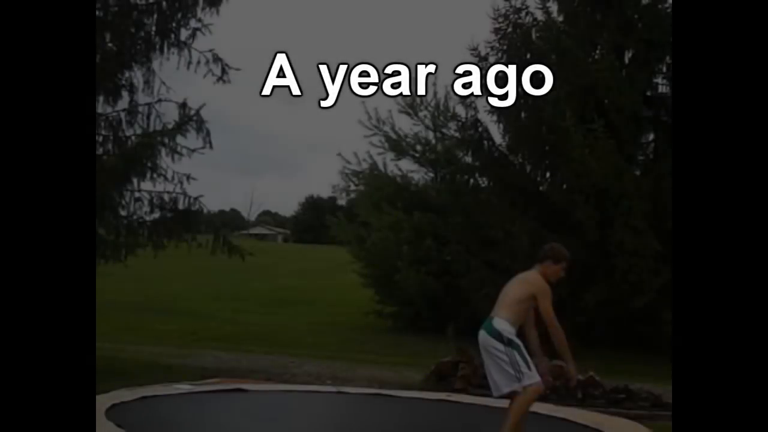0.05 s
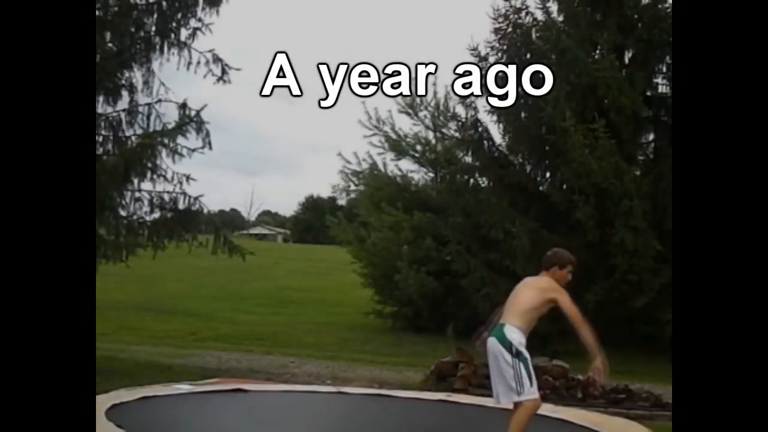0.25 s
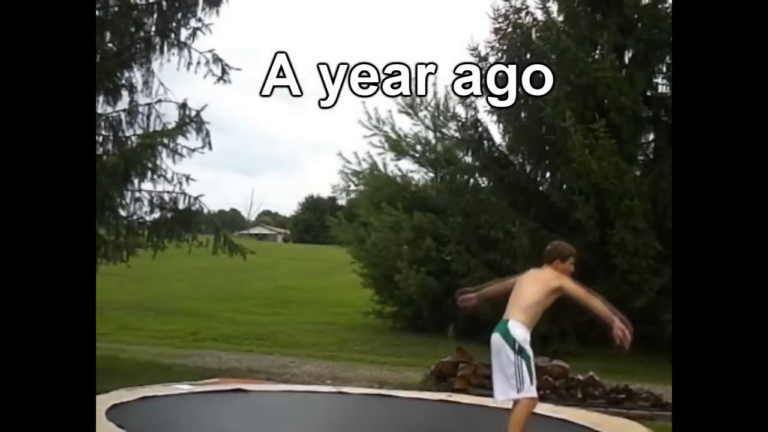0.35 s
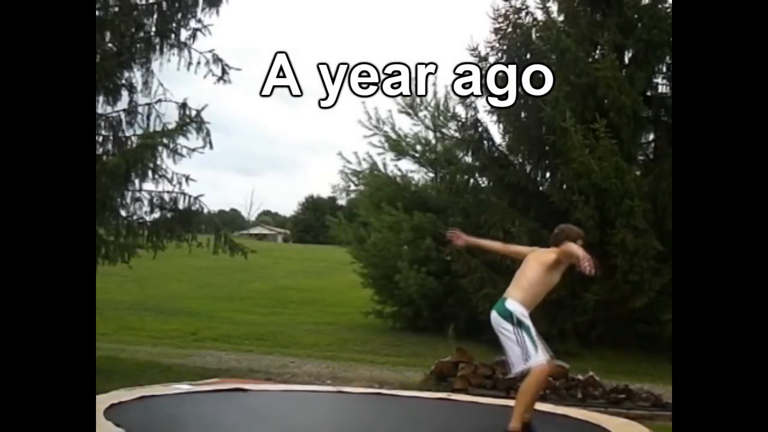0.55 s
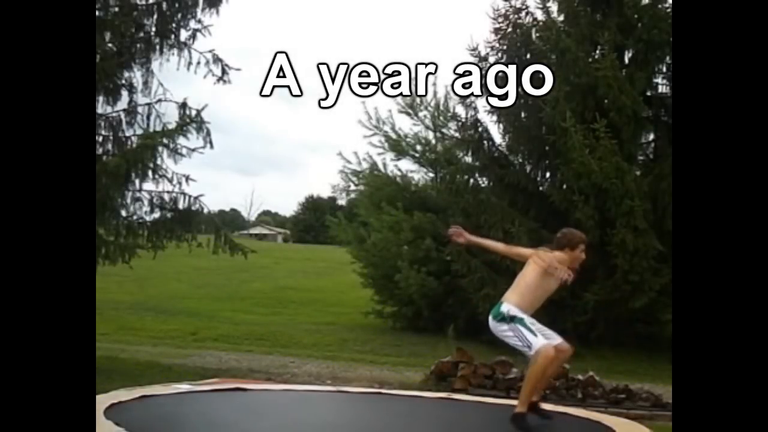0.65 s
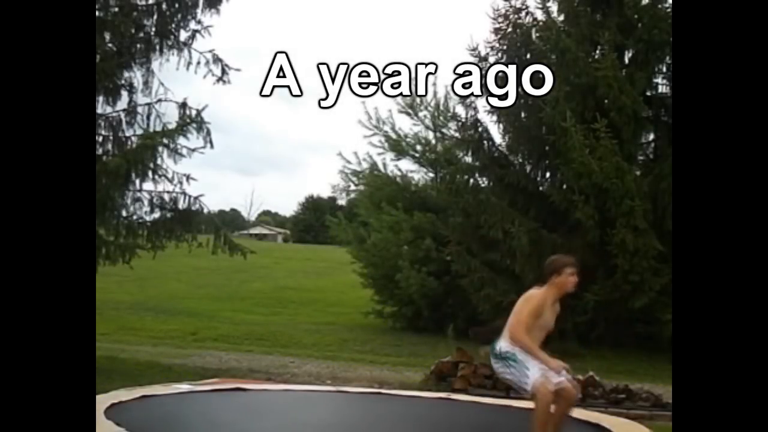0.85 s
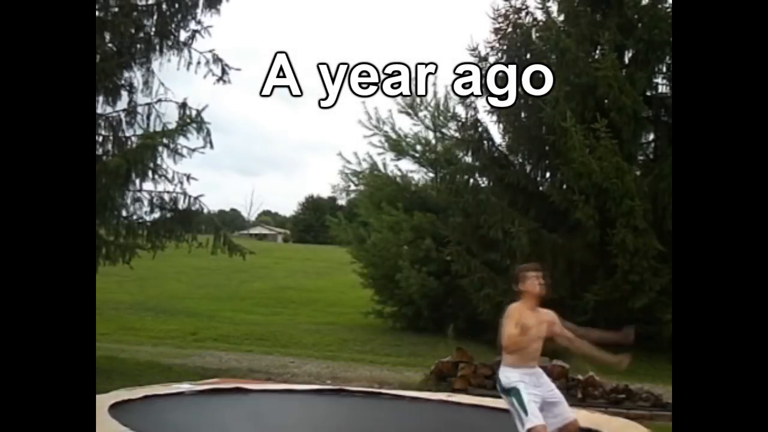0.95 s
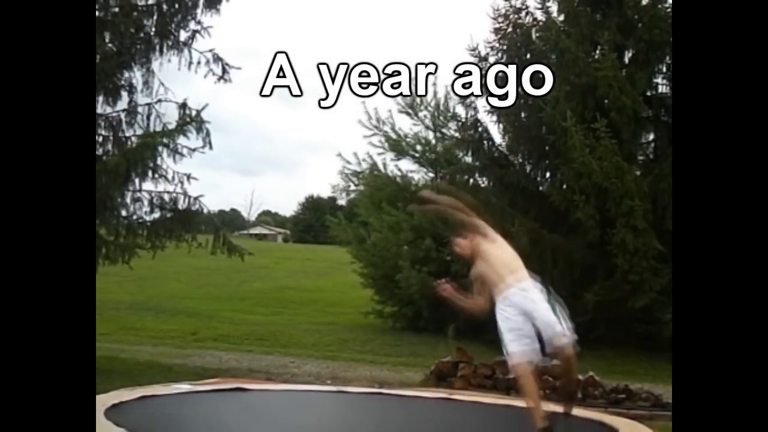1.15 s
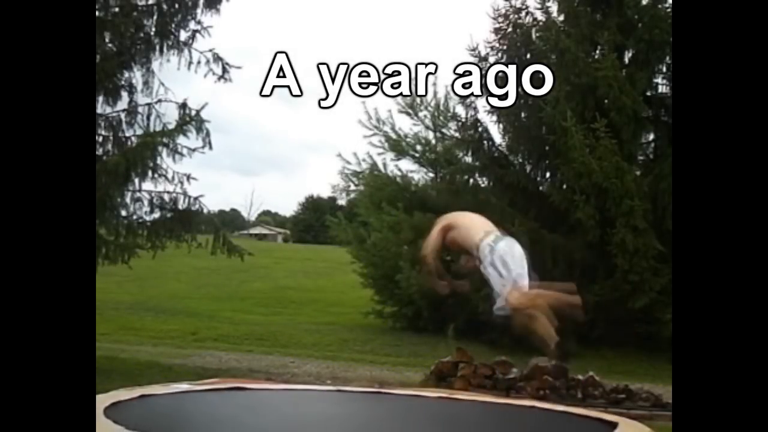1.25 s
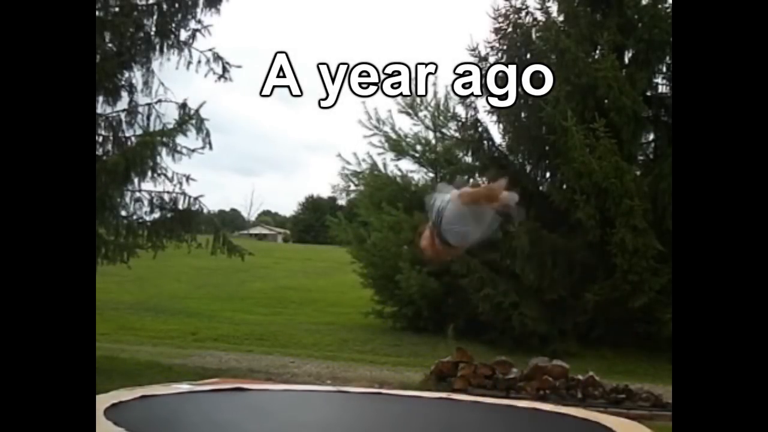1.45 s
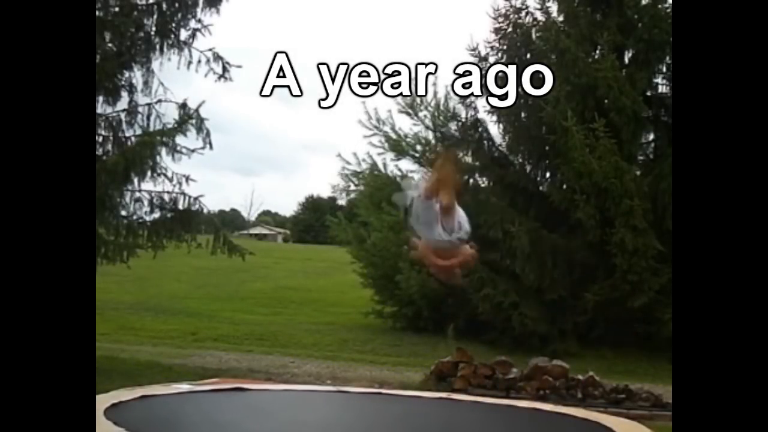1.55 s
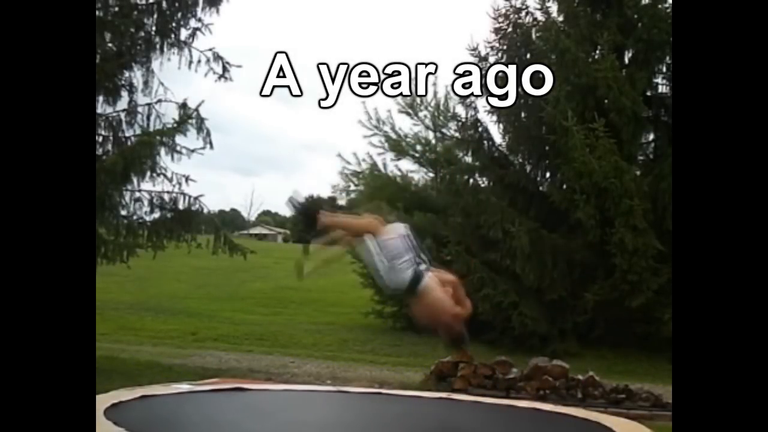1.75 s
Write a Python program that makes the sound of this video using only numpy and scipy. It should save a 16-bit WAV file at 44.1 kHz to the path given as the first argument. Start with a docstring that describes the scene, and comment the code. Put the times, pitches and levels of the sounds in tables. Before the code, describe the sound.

Trampoline mat rasping and springs clicking as someone bounces and pushes off.

```python
"""Springs tick, then a woven bed rubs and crackles: a boy bounces twice on a garden trampoline
and pushes off into a flip. Bed and edge pad rasp in countless tiny slips as they stretch, over dull thuds.
Steel springs snap in their hooks and ring, one hook squeaks, and the pad slaps back as he leaves.
Faint outdoor air and a distant hum lie behind."""
import sys
import numpy as np
from scipy import signal
from scipy.io import wavfile

SR = 44100
rng = np.random.default_rng(int(sys.argv[2]) if len(sys.argv) > 2 else 0)


def unload_audio(sound):
    """Save the sound as a 16-bit wav file, at the path given as the first command line argument."""
    columns = np.transpose(np.atleast_2d(sound))
    # keep every value between -1 and 1, then stretch to whole-number steps
    steps = np.round(np.clip(columns, -1, 1) * 32767)
    wavfile.write(sys.argv[1], SR, steps.astype(np.int16))


N = 79380
TIME = np.arange(N) / SR

# Rub envelope, first bounce and push-off: time_s, level_db
BOUNCE_ENVELOPE = [(0.22,-67),(0.256,-38.5),(0.33,-38),(0.37,-43),(0.41,-36.5),(0.455,-31.5),(0.49,-36.5),(0.545,-38.5),(0.595,-42.5),(0.62,-33.5),(0.67,-35),(0.735,-30.5),(0.77,-37),(0.80,-48.5),(0.83,-55),(0.855,-44),(0.92,-71)]
PUSH_OFF_ENVELOPE = [(0.93,-55),(0.988,-35),(1.03,-40),(1.037,-30),(1.095,-27.5),(1.16,-23.5),(1.205,-31),(1.24,-26),(1.283,-33),(1.326,-26.5),(1.349,-34),(1.37,-38.5),(1.435,-49),(1.485,-35),(1.52,-36.5),(1.555,-47),(1.59,-45.5),(1.63,-68)]
# Base tone of the rub: freq_hz, density_db
RUB_SPECTRUM = [(170,-13.5),(280,-9.5),(450,-6),(750,-5),(1200,0),(2000,0),(2900,0.5),(4200,-2.5),(6500,-6),(10800,-9.5),(12700,-24),(15000,-46)]
# Moving EQ on the rub: time_s, low_db, presence_db, treble_db
RUB_EQ = [(0.25,2.5,0.5,4.5),(0.33,7.5,1,3.5),(0.45,0,-3.5,2.5),(0.55,-6.5,-3,0),(0.63,-8,-3,0.5),(0.695,-4.5,0,-3),(0.745,-3.5,1.5,-3),(0.85,5,-2.5,-3),(1.0,-3,0,-2.5),(1.045,-1.5,7,2),(1.08,4,2,1.5),(1.14,2,1.5,-4.5),(1.185,4.5,1.5,2),(1.24,-1.5,2.5,3),(1.33,0.5,0.5,-6),(1.42,5.5,-1,0.5),(1.54,6,0.5,-6.5)]
# Stereo width of the treble, for rub and snaps: time_s, side_gain_db
TREBLE_WIDTH = [(0.2,-10.5),(0.8,5),(1.05,1),(1.15,10),(1.3,-1.5),(1.46,-1)]

def bed_rub():
    """Thousands of tiny slips of the weave a second, juddering as the bed stretches and recoils."""
    slips_per_s, slip_spread_db, smooth_share = 2600, 2, 0.68
    judder_db, judder_hz, patchy_db = 0.56, 91, 2.1
    low_hz, presence_hz, presence_octaves, treble_hz = 1090, 3760, 0.34, 5700
    fade_out = [(TIME[-1], PUSH_OFF_ENVELOPE[-1][1] - 10)]
    level_db, = automation(BOUNCE_ENVELOPE + PUSH_OFF_ENVELOPE + fade_out)
    low_db, presence_db, treble_db = automation(RUB_EQ)
    slipping = rng.random(N) < slips_per_s / SR
    slips = slipping * from_db(slip_spread_db * np.minimum(rng.exponential(1, N), 4))
    grain = np.sqrt(smooth_share + (1 - smooth_share) * rms_one(slips) ** 2)
    force = grain * from_db(level_db + judder_db * drift(judder_hz))

    def envelope(hz):
        """Strength of the rub in one band, with its own flicker."""
        eq_db = low_db / (1 + (hz / low_hz) ** 4)
        eq_db += presence_db * np.exp(-(np.log2(hz / presence_hz) / presence_octaves) ** 2)
        eq_db += treble_db / (1 + (treble_hz / hz) ** 4)
        return force * from_db(eq_db + patchy_db * drift(35.5))
    return shaped_noise(RUB_SPECTRUM, envelope, *automation(TREBLE_WIDTH))


# Hits of springs and pad: start_s, crack_db, tail_db, tilt_db_per_octave
SNAP_HITS = [(0.001,-42,-39.5,1),(0.136,-42,-30,1.5),(0.2104,-33,-30,1.5),(0.2488,-31.5,-37.5,-3),(0.3856,-41.5,-34.5,-2.5),(0.4420,-21,-43,1.5),(0.4477,-19.5,-44,2),(0.4592,-21,-38,2.5),
             (0.5684,-32,-33,1.5),(0.6070,-46,-37,5.5),(0.6856,-27.5,-35,-1),(0.8451,-41.5,-60,-9),(1.0343,-29,-28.5,6),(1.11,-25,-27.5,4),(1.1488,-23,-26.5,-2.5),(1.1624,-20,-40,2.5),
             (1.227,-22,-21,1),(1.2361,-17.5,-24,0.5),(1.2575,-36,-42,-6),(1.2950,-26.5,-39,5.5),(1.4482,-21,-27,-1.5),(1.4669,-20.5,-29,-2),(1.4687,-15,-26.5,-0.5),(1.755,-49,-57,-11.5)]
# Base tone of a snap: freq_hz, density_db
SNAP_SPECTRUM = [(250,-44.5),(500,-10),(1200,-7),(2100,3),(3000,-3),(5200,-8.5),(7500,-13),(11000,-15.5),(13000,-40),(15000,-45.5)]

def snaps():
    """Springs snap in their hooks and the pad slaps: each a crack, then a dying rattle along the rim."""
    crack_t60_s, tail_t60_s, tail_rise_s = 0.015, 0.13, 0.0036
    parts = []
    for start_s, crack_db, tail_db, tilt in SNAP_HITS:
        age = np.maximum(TIME - start_s, 0)
        crack = (age > 0) * from_db(crack_db - 60 * np.minimum(age / crack_t60_s, 10))
        tail = from_db(tail_db - 60 * age / tail_t60_s) * (1 - np.exp(-age / tail_rise_s))
        parts += [(crack ** 2, tilt), (tail ** 2, tilt + 1)]   # the tail is a little brighter
    powers, tilts = map(np.array, zip(*parts))

    def envelope(hz):
        """All snaps in one band, each tilted about 3 kHz."""
        return np.sqrt(from_db(tilts * np.log2(hz / 3000)) ** 2 @ powers)
    return shaped_noise(SNAP_SPECTRUM, envelope, *automation(TREBLE_WIDTH))


# Steel spring modes: pitch_hz, relative_level_db, t60_s
SPRING_MODES = [(1011,-23.5,0.22),(1195,-24,0.064),(1820,-20,0.4),(2185,-18,0.15),(2690,-22.5,.06),(2975,-21,0.2),(3520,-26.5,0.18),(3630,-35,0.1),(3700,-16.5,0.045),(5177,-20.5,0.06),(10900,-32,0.11)]

def spring_ring(shaking):
    """The springs ring in sympathy with bed and rim."""
    ringing = sum(from_db(db) * rms_one(resonator(shaking * rng.standard_normal(N), hz, t60))
                  for hz, db, t60 in SPRING_MODES)
    return np.std(shaking) * ringing


# Partials of the squeak: harmonic, peak_s, width_s, level_db
SQUEAK_PARTIALS = [(1,1,0.0132,-38),(2,1,0.017,-37.5),(3,0.98,0.008,-34.5),(4,0.97,0.011,-51),(6,0.988,.01,-55)]

def hook_squeak():
    """A hook turns in its ring: a brief rough tone whose partials peak one after another."""
    phase = stick_slip_phase(1274.5, roughness=0.0298)
    return sum(np.sqrt(2) * from_db(db) / (1 + ((TIME - peak_s) / width_s) ** 2) * np.sin(k * phase)
               for k, peak_s, width_s, db in SQUEAK_PARTIALS)


# Short rough chirps: peak_s, pitch_hz, width_s, level_db
CHIRP_HITS = [(0.444,5200,0.00182,-27.5),(0.461,5150,.005,-34.5),(0.725,1600,0.0068,-40),(0.738,3450,0.0097,-39),(0.748,3950,0.014,-38.5),(1.007,695,0.012,-45.5),(1.036,3500,0.0026,-29),(1.043,6800,0.002,-29),(1.075,2600,.003,-31.5),(1.152,2680,0.0025,-19),(1.303,1450,0.0022,-32.5),(1.322,1050,0.0065,-36),(1.524,2630,0.0018,-36.5),(1.582,3200,.009,-51)]

def chirps():
    """Hooks and straps slip and catch one resonance for a moment."""
    out = 0
    for peak_s, hz, width_s, db in CHIRP_HITS:
        swell = np.sqrt(2) * from_db(db) * np.exp(-((TIME - peak_s) / width_s) ** 2 / 2)
        out += swell * np.sin(stick_slip_phase(hz, roughness=0.03))
    return out


# Dull thuds: peak_s, pitch_hz, width_s, level_db
THUD_HITS = [(0.25,38,.014,-57),(1.05,35.6,0.014,-54),(1.182,438,0.0028,-26)]

def thuds():
    """Soft blows on bed and frame swell and die within a few cycles."""
    return sum(from_db(db) * np.sin(2 * np.pi * hz * (TIME - peak_s)) / np.cosh((TIME - peak_s) / width_s)
               for peak_s, hz, width_s, db in THUD_HITS)


# Tone of the garden air: freq_hz, density_db
AIR_SPECTRUM = [(25,1),(45,-15),(75,-20.5),(125,-1),(240,-0.5),(400,-2.5),(700,-3.5),(1200,-8),(2000,-9.5),(4000,-13),(10000,-19.5),(12500,-31),(15000,-61)]

def outdoor_air():
    """A faint wash of air, each band fluttering around -48 dB."""
    return shaped_noise(AIR_SPECTRUM, lambda hz: from_db(-48 + 2.06 * drift(11)), width_db=2.5)


# Tones of the hum: pitch_hz, level_db
HUM_TONES = [(240,-62),(444,-65.5),(764,-68),(1908,-62.5)]

def distant_hum():
    """Faint steady tones, each wavering in pitch."""
    waver_hz = 5.2
    return sum(np.sqrt(2) * from_db(db) * np.sin(2 * np.pi * np.cumsum(hz + waver_hz * drift(20)) / SR)
               for hz, db in HUM_TONES)


# Stereo image of the noise before widening: freq_hz, left_right_correlation
STEREO_CORRELATION = [(60,0.95),(500,0.81),(1000,0.83),(2000,0.74),(4000,0.81),(8000,0.79),(12000,.56)]
# Its slight lean to the right: freq_hz, left_minus_right_db
STEREO_BALANCE = [(60,-1.5),(300,-0.7),(700,-0.7),(2000,-0.7),(5000,-0.5),(9000,-1),(13000,-3)]

def shaped_noise(spectrum, envelope, width_db=0.0):
    """Stereo noise, band by band: envelope(hz) sets the level, width_db the spread above 3 kHz."""
    edges = np.concatenate([np.geomspace(22, 6000, 21), np.linspace(7300, 15800, 7)])
    centres = np.sqrt(edges[1:] * edges[:-1])
    white = rng.standard_normal((2, 2, N))   # neighbouring bands take different mid/side pairs
    left_right = np.array([[1], [-1]])
    gains = from_db(at_hz(spectrum, centres)) / (1 + (spectrum[0][0] / centres) ** 4)
    gains /= np.sqrt(np.sum(gains ** 2 * np.diff(edges)) * 2 / SR)   # unit total power
    out = 0
    for k, hz in enumerate(centres):
        band = signal.butter(2, edges[k:k + 2], "band", fs=SR, output="sos")
        mid, side = signal.sosfilt(band, white[k % 2] * envelope(hz) + 1e-18)
        alike = at_hz(STEREO_CORRELATION, hz)
        spread = np.sqrt((1 - alike) / (1 + alike)) * from_db(width_db / (1 + (3000 / hz) ** 2))
        pan = from_db(at_hz(STEREO_BALANCE, hz) * left_right / 2)
        out += gains[k] * (mid + spread * side * left_right) * pan
    return out


def stick_slip_phase(hz, roughness):
    """Phase of a stick-slip tone whose pitch trembles."""
    return 2 * np.pi * np.cumsum(hz * (1 + roughness * drift(250))) / SR


def resonator(x, hz, t60):
    """One mode; a unit click rings with height 1."""
    r, w = np.exp(-np.log(1000) / (t60 * SR)), 2 * np.pi * hz / SR
    return signal.lfilter([0, np.sin(w)], [1, -2 * r * np.cos(w), r * r], x + 1e-18)


def drift(rate_hz):
    """Smooth random modulation with rms 1."""
    hop, settle = 40, 2000
    r = np.exp(-2 * np.pi * hop * rate_hz / SR)
    slow = signal.lfilter([1], [1, -2 * r, r * r], rng.standard_normal(N // hop + settle + 2))[settle:]
    return np.interp(np.arange(N) / hop, np.arange(len(slow)), rms_one(slow))


def automation(rows):
    """One curve per column, sample by sample."""
    times, *columns = np.transpose(rows)
    return [np.interp(TIME, times, column) for column in columns]


def at_hz(points, hz):
    """Read a curve at a frequency."""
    freqs, values = np.transpose(points)
    return np.interp(np.log(hz), np.log(freqs), values)


def from_db(db):
    """Decibels to gain."""
    return 10 ** (np.asarray(db) / 20)


def rms_one(x):
    """Scale to rms 1."""
    return x / np.sqrt(np.mean(x ** 2) + 1e-20)


def scene():
    """The trampoline stands close by, nearly in the middle, with the garden behind."""
    shaking = bed_rub() + snaps()
    trampoline = shaking + spring_ring(shaking) + hook_squeak() + chirps() + thuds()
    return trampoline + outdoor_air() + distant_hum()


def record(dry):
    """Master chain: soft-clipped peaks, a narrow treble notch and a steep top cut."""
    ceiling, notch_hz, cutoff_hz = 0.47, 7790, 15500
    rounded = ceiling * np.tanh(dry / ceiling)
    notched = signal.lfilter(*signal.iirnotch(notch_hz, Q=42, fs=SR), rounded)
    return signal.sosfilt(signal.ellip(10, .3, 80, cutoff_hz, fs=SR, output="sos"), notched)


dry = scene()
out = record(dry)
unload_audio(out)
```